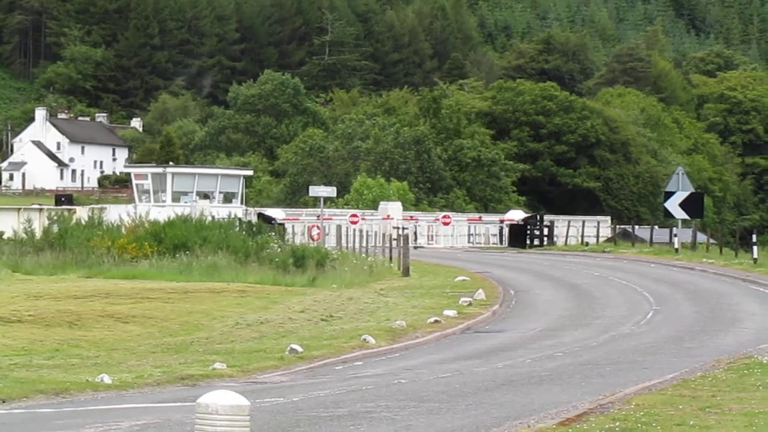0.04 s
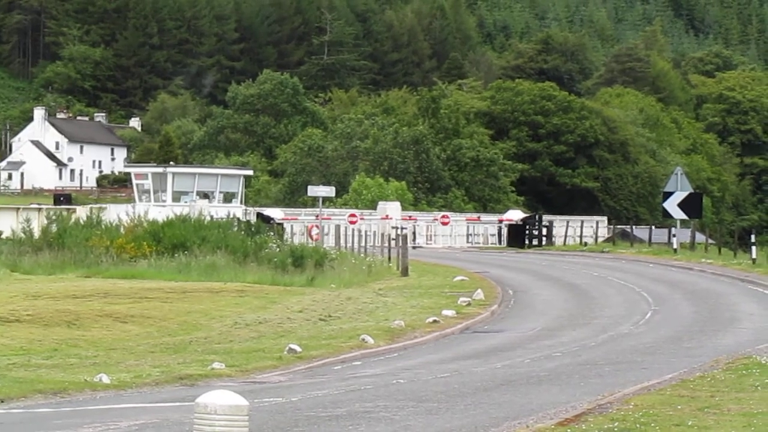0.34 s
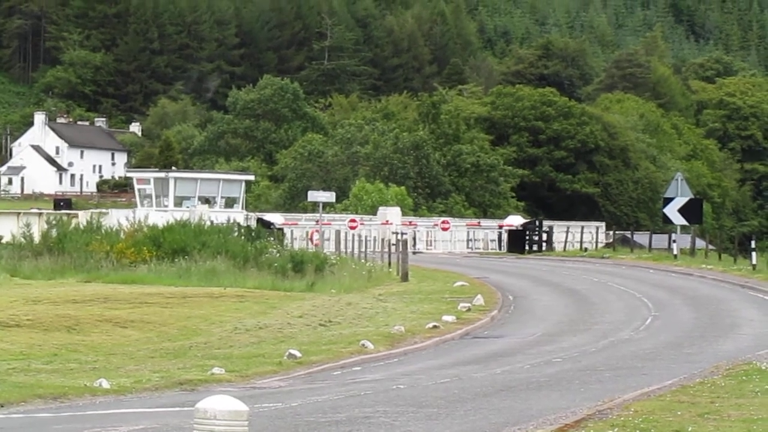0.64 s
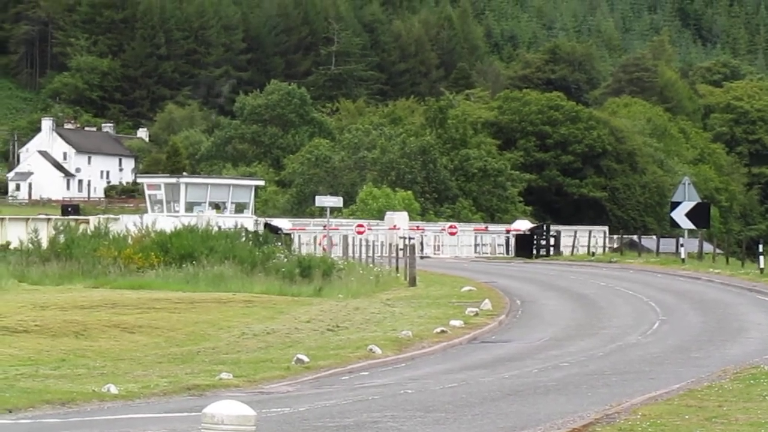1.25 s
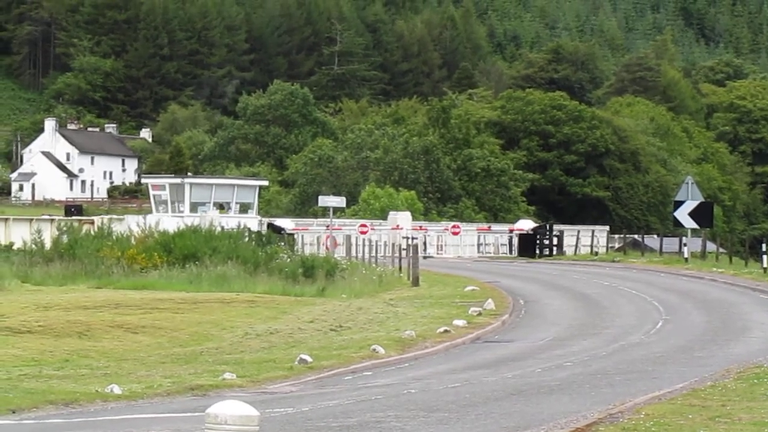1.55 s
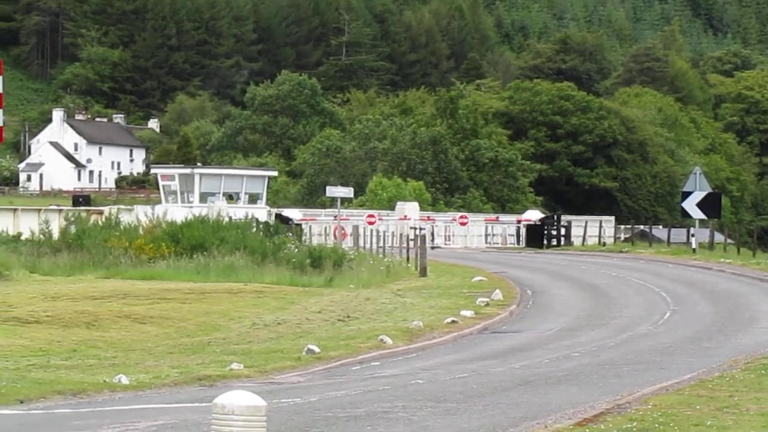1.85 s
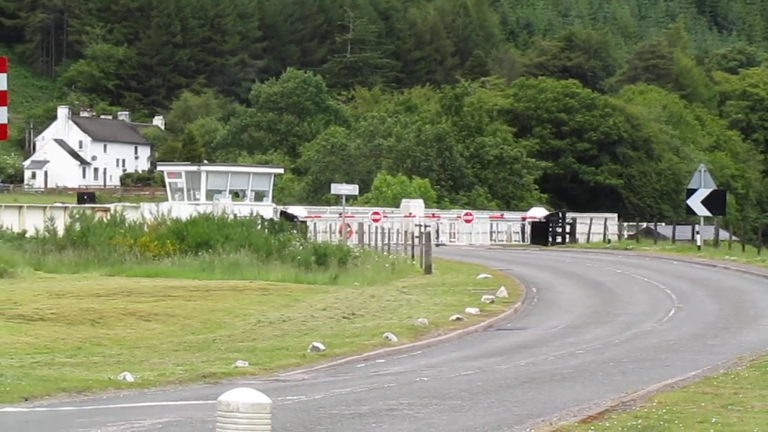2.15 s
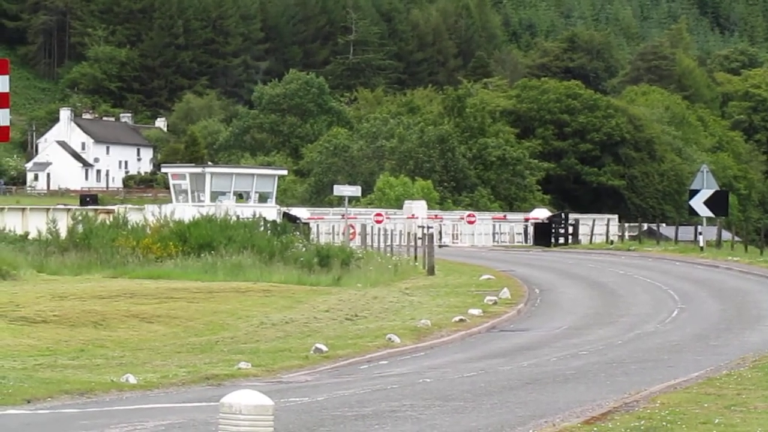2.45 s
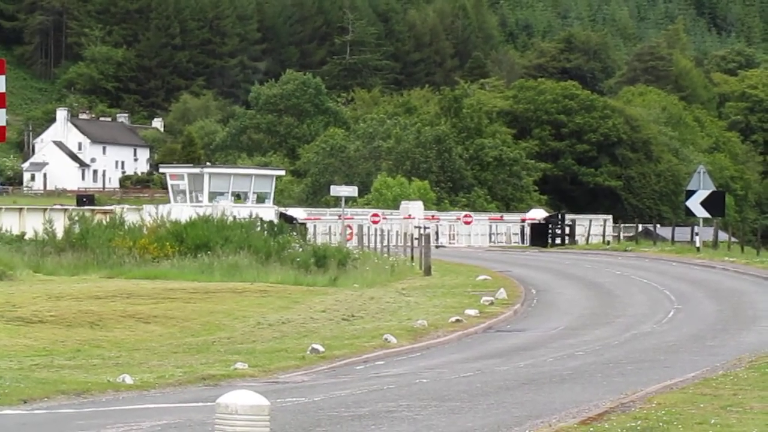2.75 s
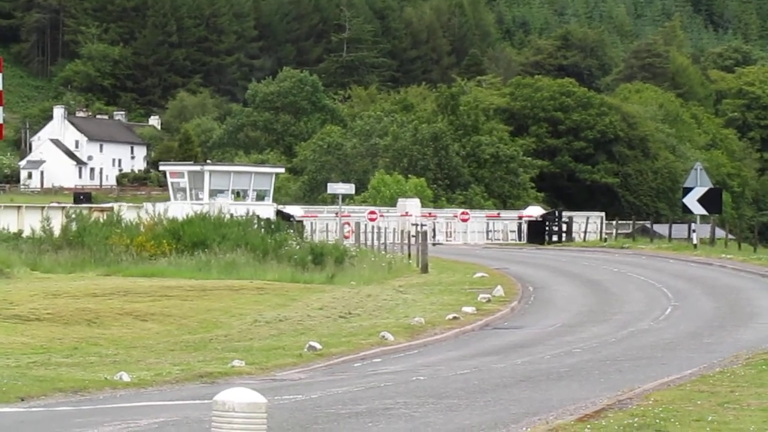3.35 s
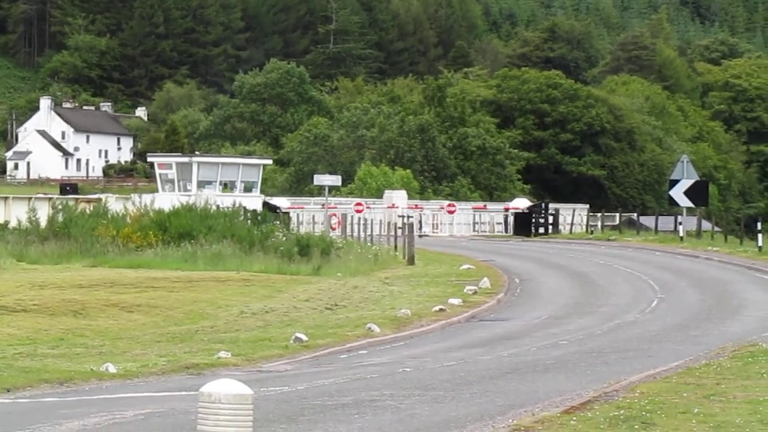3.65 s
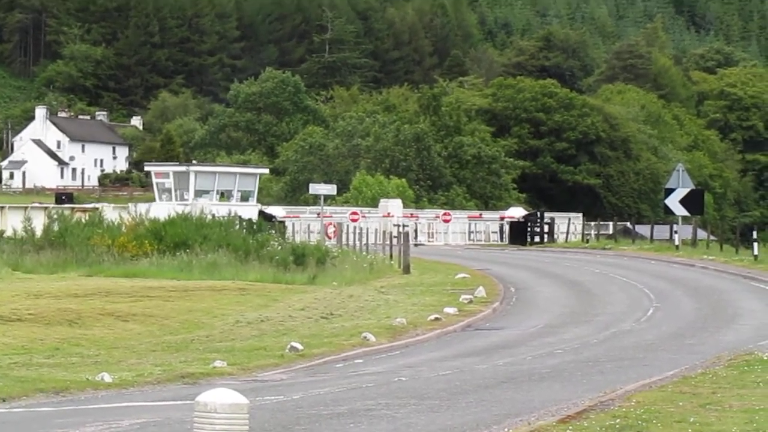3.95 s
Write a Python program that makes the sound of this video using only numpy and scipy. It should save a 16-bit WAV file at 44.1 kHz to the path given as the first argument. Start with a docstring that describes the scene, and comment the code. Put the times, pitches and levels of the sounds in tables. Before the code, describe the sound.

A starter whines and a nearby engine catches, after birdsong and light wind outdoors.

```python
"""Beside a country road, a distant wash of noise goes on while wind nudges the microphone
and a songbird twitters. From about 1 s a far bird hoots twice. At about 2.6 s a nearby vehicle
starts: the starter motor clacks in and whines, slowed each time a piston squeezes its air.
Just after 3 s the engine catches, revs up and settles towards idle while the starter spins down
and the songbird calls twice."""
import sys
import numpy as np
from scipy import signal
from scipy.fft import rfft, irfft
from scipy.io import wavfile

SR = 44100
rng = np.random.default_rng(int(sys.argv[2]) if len(sys.argv) > 2 else 0)


def pcm_store(signal):
    """Save signal as 16-bit PCM."""
    levels = np.round(np.clip(np.atleast_2d(signal), -1, 1) * 32767)
    wavfile.write(sys.argv[1], SR, levels.astype(np.int16).T)


N = 176400
T = np.arange(N) / SR


def amp(db):
    """Turns decibels into a number to multiply by."""
    return 10 ** (np.asarray(db) / 20)


def unit(x):
    """Scales a signal to an average strength (rms) of 1."""
    return x / np.sqrt(np.mean(abs(x) ** 2) + 1e-20)


def level(rows, column=1):
    """Loudness over time from a table's dB column; silent before the first row."""
    rows = np.array(rows)
    return amp(np.interp(T, rows[:, 0], rows[:, column], left=-200))


def wander(hz):
    """A smooth random wobble, up to about hz times a second."""
    f = np.fft.rfftfreq(N, 1 / SR)
    return unit(irfft(rfft(rng.standard_normal(N)) * np.exp(-(f / hz) ** 2), N))


def tone(hz, waver_hz):
    """A tone whose pitch wavers."""
    return unit(np.sin(2 * np.pi * np.cumsum(hz + waver_hz * wander(hz=40)) / SR))


def rattle(grain_db=2):
    """Noise like many tiny hits of uneven size."""
    return unit(rng.standard_normal(N) * amp(grain_db * wander(hz=700)))


def blows(rows, rise_s=.003):
    """Loudness of hits that rise fast and die away; each row is t/s, level/dB, decay/s."""
    power = 0
    for start, db, decay in rows:
        age = np.maximum(T - start, 0)
        fade = np.exp(-np.maximum(age - rise_s, 0) / decay)
        power += (amp(db) * np.minimum(age / rise_s, 1) * fade) ** 2
    return np.sqrt(power)


def colour(x, spectrum, modes=(), size=8192):
    """Sets the balance of low and high, plus pitches that ring (modes); its dB are only relative."""
    f = np.abs(np.fft.fftfreq(size, 1 / SR))
    hz, db = np.transpose(spectrum)
    power = amp(np.interp(np.log(f + 1), np.log(hz), db)) ** 2
    for centre, width, peak_db in modes:
        power += (amp(peak_db) / (1 + ((f - centre) / width) ** 2)) ** 2
    response = np.exp(signal.hilbert(np.log(power) / 2).conj())  # rings after a hit, never before
    taps = np.fft.ifft(response).real[:size // 2]
    return signal.oaconvolve(x, taps / np.linalg.norm(taps))[:N]


def stereo_noise(spectrum, likeness):
    """Left and right noise: likeness 1 is the same, 0 unrelated, -1 opposite."""
    left, other = (colour(rng.standard_normal(N), spectrum) for _ in range(2))
    return np.array([left, likeness * left + np.sqrt(1 - likeness ** 2) * other])


def outdoors(x, left_db, echo_db, delay_s=.008, fade_s=.3, echoes_per_s=2000):
    """Adds scattered echoes from trees and ground, and leans the sound to the left."""
    t = T[:SR // 2]
    taps = rng.standard_normal((2, len(t))) * (rng.random((2, len(t))) < echoes_per_s / SR)
    taps *= (t > delay_s) * np.exp(-np.log(1000) * t / fade_s)
    taps /= np.linalg.norm(taps, axis=1, keepdims=True)
    echoes = signal.fftconvolve(x[None], taps, axes=1)[:, :N]
    return (x + amp(echo_db) * echoes) * amp([[left_db], [-left_db]])


# low-to-high balance of the distant noise: f/Hz, level/dB
WASH_SPECTRUM = [(30, -67), (300, -20), (700, -6), (1300, 0), (2700, -7), (3900, -21), (6500, -18.5),
                 (11000, -30), (15000, -58)]


def distant_wash(db=-48.5, left_db=.5):
    """A soft, far-off rush whose loudness flickers slightly."""
    rush = stereo_noise(WASH_SPECTRUM, likeness=.87)
    return rush * amp(db + .6 * wander(hz=25)) * amp([[left_db], [-left_db]])


# the wind's deep sound: f/Hz, level/dB
WIND_SPECTRUM = [(20, -15), (150, 0), (450, -5), (900, -24), (3000, -55)]
# how loudly it rumbles: t/s, level/dB
WIND_LEVEL = [(0, -60), (.8, -75), (1.5, -57.5), (2.5, -48.5), (3.3, -43.5)]
# puffs that hit the microphone: t/s, level/dB, decay/s
WIND_PUFFS = [(.015, -44, .014), (.126, -43.5, .007), (.222, -43, .09), (.447, -34, .011)]


def wind():
    """Air rumbles and bumps on the microphone, differently on each side."""
    rumble = stereo_noise(WIND_SPECTRUM, likeness=0) * level(WIND_LEVEL)
    return rumble + stereo_noise(WIND_SPECTRUM, likeness=-.6) * blows(WIND_PUFFS)


def whistle(start, length, first_hz, middle_hz, last_hz, db, trill_hz=0, trill_rate=0):
    """One sliding bird note; a trill swings its pitch unevenly and is loudest on the way down."""
    progress = (T - start) / length
    on = (progress > 0) & (progress < 1)
    progress = progress[on]
    swing = 0
    if trill_rate:
        swing = 2 * np.pi * np.cumsum(trill_rate * (1 + .15 * wander(hz=92)[on])) / SR
    arch = (2 * middle_hz - first_hz - last_hz) * 2 * progress * (1 - progress)
    hz = first_hz + (last_hz - first_hz) * progress + arch - trill_hz * np.cos(swing)
    loudness = amp(db - 8 * np.sin(swing)) * np.sin(np.pi * progress) ** .54
    out = np.zeros(N)
    out[on] = loudness * np.sqrt(2) * np.sin(2 * np.pi * np.cumsum(hz) / SR)
    return out


# single notes: t/s, length/s, first f/Hz, middle f/Hz, last f/Hz, level/dB; trills add depth/Hz, rate/Hz
SONG_NOTES = [(.878, .028, 5300, 5700, 5800, -51), (.895, .022, 5000, 4500, 3900, -49),
              (.916, .026, 4800, 5100, 5200, -45, 500, 190), (.936, .062, 5080, 5055, 5045, -35.5),
              (1.47, .075, 6750, 6200, 5400, -45), (1.53, .065, 5650, 5100, 4600, -45, 60, 62),
              (1.594, .06, 4440, 4280, 4150, -52), (1.55, .175, 3480, 3220, 3080, -52, 50, 48),
              (2.267, .1, 4900, 5000, 4850, -50, 480, 62), (2.343, .062, 4400, 4270, 4150, -54),
              (3.717, .031, 3100, 2960, 2870, -45)]
# two repeated phrases: same columns, with t/s counted from the start of the phrase
TWITTER_NOTES = [(0, .048, 6450, 6900, 7050, -49, 380, 32), (.051, .014, 7500, 6200, 4600, -46),
                 (.063, .052, 5650, 5250, 4400, -47, 380, 100), (.068, .033, 4350, 4050, 3350, -52),
                 (.106, .042, 3150, 3620, 3050, -49)]
CALL_NOTES = [(0, .036, 5480, 5290, 5140, -45), (.032, .075, 4250, 4450, 4300, -42.5)]
# faint, high wheezes: t/s, length/s, f/Hz, level/dB
SONG_WHEEZES = [(.56, .36, 6170, -57), (1.53, .1, 12800, -74)]


def songbird(twitters_s=(-.05, .407), calls_s=(3.105, 3.65)):
    """A bird a little to the left whistles two twitters, single notes, then two calls."""
    phrases = [(s, TWITTER_NOTES) for s in twitters_s] + [(s, CALL_NOTES) for s in calls_s]
    phrases.append((0, SONG_NOTES))
    song = sum(whistle(s + after, *row) for s, rows in phrases for after, *row in rows)
    song *= amp(2.5 * wander(hz=90))  # quick flutter
    wheezes = sum(whistle(s, length, hz, hz, hz, db) for s, length, hz, db in SONG_WHEEZES)
    wheezes *= wander(hz=1700)  # smears each tone into a hiss
    return outdoors(song + wheezes, left_db=1, echo_db=-5)


# two hoots: t/s, level/dB
FAR_HOOTS = [(.99, -47), (1.39, -47)]


def far_bird(length_s=.052, hz=1080, arch_hz=50):
    """A far bird gives short, lower hoots that rise and fall a little."""
    hoots = sum(whistle(s, length_s, hz, hz + arch_hz, hz, db) for s, db in FAR_HOOTS)
    return outdoors(hoots * amp(2 * wander(hz=150)), left_db=.5, echo_db=-5)


# metal hitting metal: t/s, level/dB, decay/s
KNOCK_HITS = [(2.557, -25.5, 0.019), (2.578, -28.5, .016), (2.996, -32, .05), (3.166, -37.5, .012),
              (3.235, -30.5, .011)]
# their hard, bright sound: f/Hz, level/dB
KNOCK_SPECTRUM = [(30, -30), (450, -12), (800, -1), (3000, -2), (3900, -9), (10300, -16), (13000, -52)]


def metal_knocks():
    """The starter's small gear clacks into place, then the first firings knock."""
    return colour(rattle() * blows(KNOCK_HITS), KNOCK_SPECTRUM)


# strain on the gears as pistons squeeze air: peak t/s, build-up/s, level/dB
SQUEEZES = [(2.585, .03, -32), (2.638, .006, -32), (2.71, .035, -33.5), (2.815, .035, -33),
            (2.866, .022, -26), (3.031, .02, -26.5)]
# overall sound of the starter's case: f/Hz, level/dB
CASE_SPECTRUM = [(30, -45), (150, -27), (450, -18), (680, -7.5), (2900, -19), (3900, -34), (8200, -35),
                 (15000, -75)]
# pitches at which the case rings: f/Hz, width/Hz, level/dB
CASE_MODES = [(264, 37, -9), (711, 34, -1.5), (1570, 40, -11), (2190, 90, -11.5)]
RELEASE_S, GEARS_APART_S = .024, 3.3
CATCH = (3.236, -33, .06)  # the jolt as the engine catches: t/s, level/dB, decay/s


def starter_gears(grind_db=-3, unloaded_db=-42, ring_hz=858, ring_db=-4):
    """Each squeeze grinds the gears and makes the case ring; the engine's catch rings it too."""
    strain = 0
    for peak, rise, db in SQUEEZES:
        width = np.where(T < peak, rise, RELEASE_S)
        strain += amp(db) * np.exp(-((T - peak) / width) ** 2)
    engaged = (T > KNOCK_HITS[0][0]) * np.clip((GEARS_APART_S - T) / .15, 0, 1)
    rubbing = engaged * np.hypot(amp(grind_db) * strain, amp(unloaded_db))
    grind = colour(rattle() * rubbing, CASE_SPECTRUM, CASE_MODES)
    shaking = engaged * np.hypot(strain, amp(unloaded_db)) + blows([CATCH])
    ring = tone(ring_hz, waver_hz=12) * amp(2 * wander(hz=90)) * shaking
    return grind + amp(ring_db) * ring


# how loud the hiss is: t/s, level/dB
SPIN_LEVEL = [(2.56, -52.5), (2.95, -51), (3.06, -49), (3.355, -43.5), (3.41, -58), (3.77, -48.5),
              (3.82, -73)]
# its thin, high sound: f/Hz, level/dB
SPIN_SPECTRUM = [(1000, -30), (3000, -4), (8300, 0), (10500, -10), (12000, -47)]


def starter_hiss():
    """The spinning starter and belt hiss."""
    return colour(rattle() * level(SPIN_LEVEL), SPIN_SPECTRUM)


# pitch and loudness of the gear teeth: t/s, f/Hz, level/dB
GEAR_WHINE = [(2.62, 2250, -44), (2.715, 2230, -39), (2.77, 3300, -48), (2.835, 3050, -42),
              (2.89, 2250, -46), (2.93, 3000, -42), (2.98, 3520, -54), (3.05, 2430, -40), (3.11, 3300, -49),
              (3.3, 4250, -53), (3.42, 3550, -52), (3.49, 3080, -42), (3.65, 2070, -47)]


def starter_whine(fuzz_hz=140, pure_part=.5):
    """Gear teeth whine at a pitch that follows their speed; each squeeze drags it down."""
    times, hz, _ = np.transpose(GEAR_WHINE)
    spin = np.exp(2j * np.pi * np.cumsum(np.interp(T, times, hz)) / SR)
    fuzz = unit(wander(fuzz_hz) + 1j * wander(fuzz_hz))  # roughens the pure tone
    fade = np.exp(-np.maximum(T - times[-1], 0) / RELEASE_S)
    return unit((spin * (pure_part + fuzz)).real) * level(GEAR_WHINE, column=2) * fade


# how often the engine fires: t/s, rate/Hz
FIRING_RATE = [(3.14, 11), (3.3, 17), (3.52, 30), (4, 27)]
# how loud it is: t/s, clatter level/dB, exhaust level/dB
ENGINE_LEVELS = [(3.14, -40, -51), (3.31, -36.5, -43.5), (3.47, -39, -47), (3.55, -39, -40),
                 (3.7, -41, -51), (4, -40.5, -51)]
# overall sound of the block, the engine's metal body: f/Hz, level/dB
BLOCK_SPECTRUM = [(30, -40), (450, -9), (1800, -18), (3000, -17.5), (3900, -34), (6400, -30),
                  (11000, -38.5), (15000, -82)]
# pitches at which the block rings: f/Hz, width/Hz, level/dB
BLOCK_RINGS = [(732, 46, 2), (850, 40, -4), (1010, 30, -6), (1480, 170, -4), (2170, 55, -13)]
# the exhaust pipe's low sound: f/Hz, level/dB
EXHAUST_SPECTRUM = [(25, -20), (180, -4), (420, -8), (1000, -35), (4000, -70)]
FIRST_FIRING = (3.141, -34.5, .014)  # t/s, level/dB, decay/s


def engine(firing_decay_s=.031, drone_db=-1, thump_db=-8):
    """Each firing rattles the block and puffs through the droning exhaust; the catch thumps."""
    rate = np.interp(T, *np.transpose(FIRING_RATE))
    firings = np.cumsum(rate * (T > FIRING_RATE[0][0])) / SR
    since_firing = (firings % 1) / rate
    pulse = np.exp(-since_firing / firing_decay_s) * amp(2 * wander(hz=20))
    shaking = (1 + .35 * pulse) * level(ENGINE_LEVELS, column=1)
    clatter = colour(rattle() * shaking, BLOCK_SPECTRUM, BLOCK_RINGS)
    kick = tone(BLOCK_RINGS[0][0], waver_hz=12) * blows([FIRST_FIRING])
    gas_flow = (1 + .49 * pulse) * level(ENGINE_LEVELS, column=2)
    puffs = colour(rng.standard_normal(N) * gas_flow, EXHAUST_SPECTRUM)
    drone = amp(drone_db) * gas_flow * tone(hz=272, waver_hz=11)
    thump = amp(thump_db) * tone(hz=76, waver_hz=11) * blows([CATCH])
    return clatter + kick + puffs + drone + thump


def scene(right_delay_s=.00004):
    """Wash, birds and vehicle reach the left side slightly first; wind hits the microphone itself."""
    wash = distant_wash()
    vehicle = starter_whine() + starter_gears() + starter_hiss() + metal_knocks() + engine()
    left, right = wash + outdoors(vehicle, left_db=.6, echo_db=-15) + songbird() + far_bird()
    delay = np.exp(-2j * np.pi * np.fft.rfftfreq(N, 1 / SR) * right_delay_s)
    return np.array([left, irfft(rfft(right) * delay, N)]) + wind()


def record(dry):
    """Cuts away the very highest treble, above 15000 Hz."""
    low_pass = signal.firwin(511, 15000, window=("kaiser", 9), fs=SR)
    return signal.oaconvolve(dry, low_pass[None], "same")


dry = scene()
out = record(dry)
pcm_store(out)
```